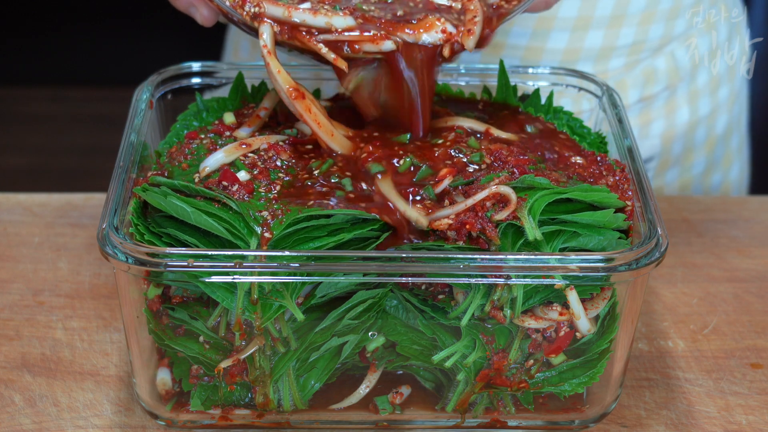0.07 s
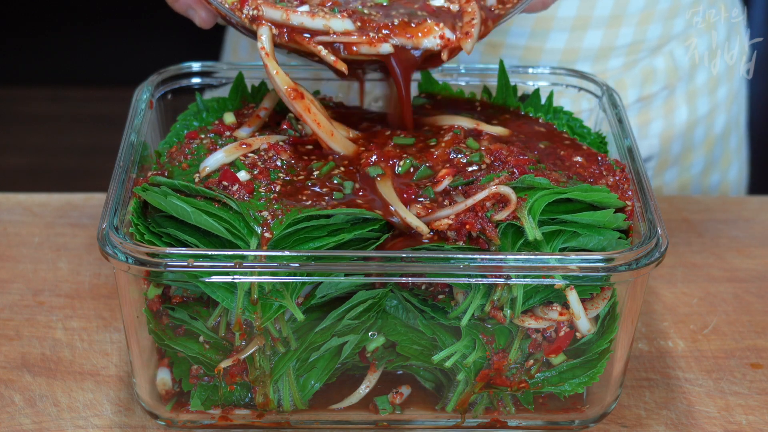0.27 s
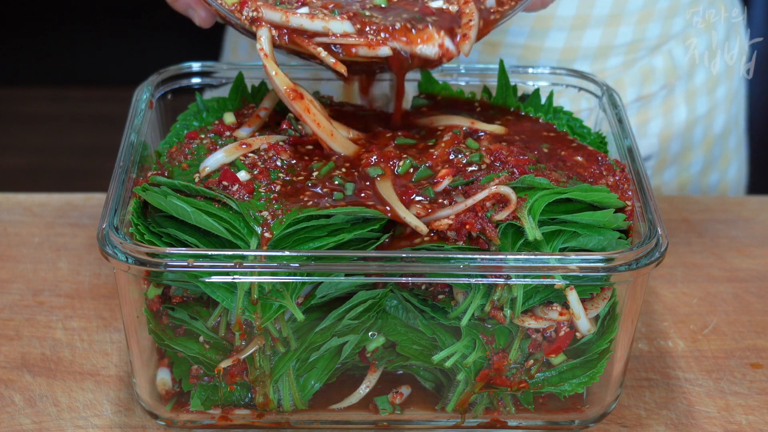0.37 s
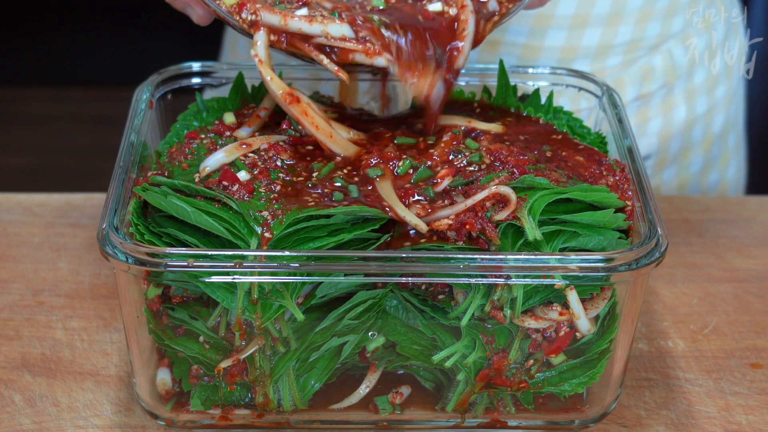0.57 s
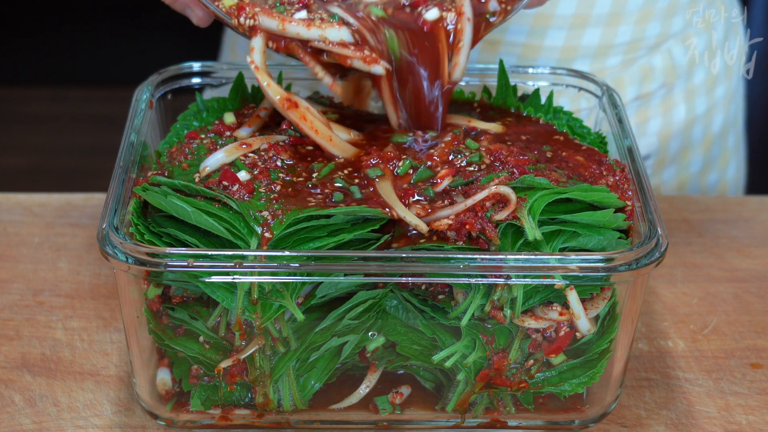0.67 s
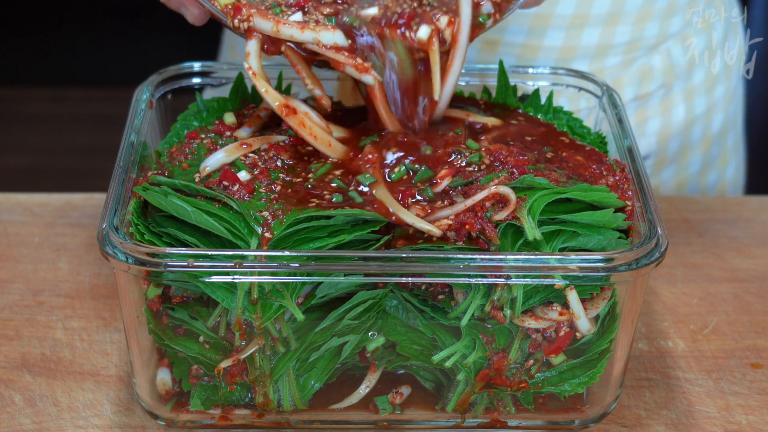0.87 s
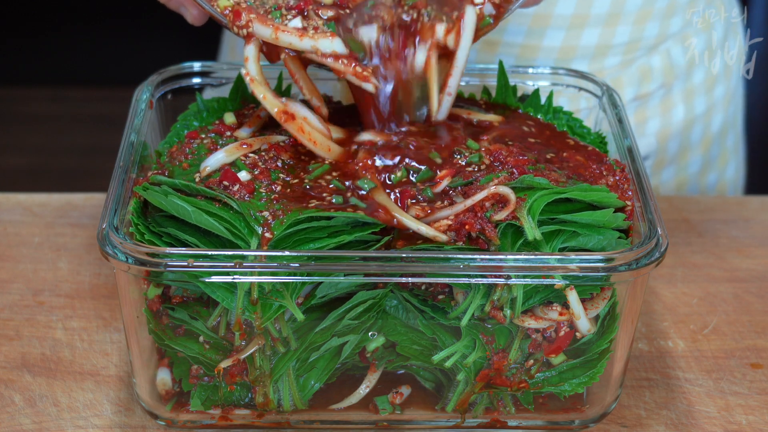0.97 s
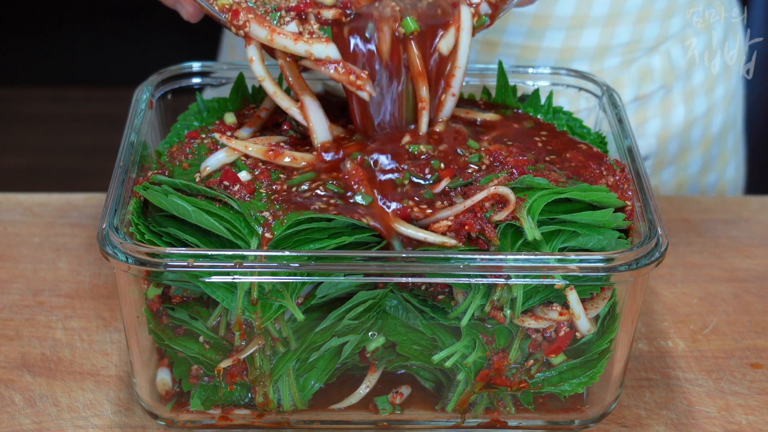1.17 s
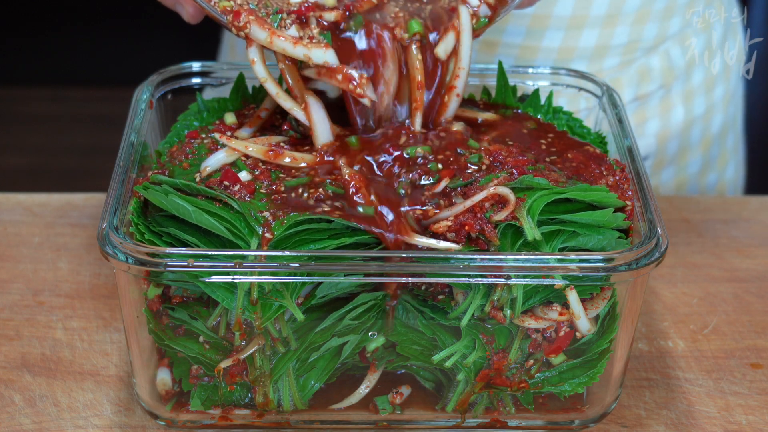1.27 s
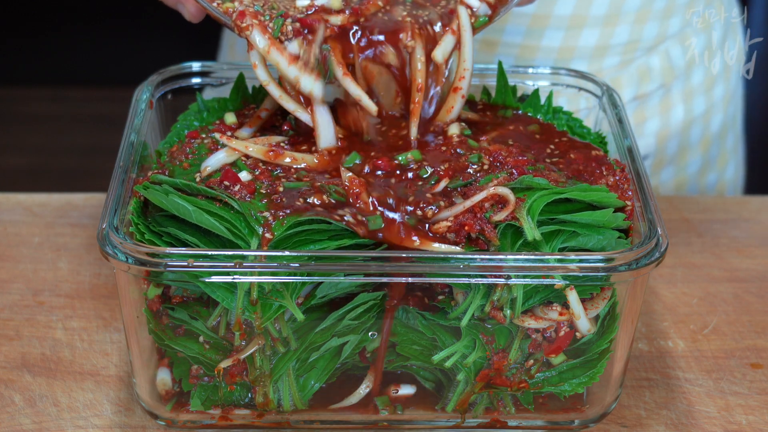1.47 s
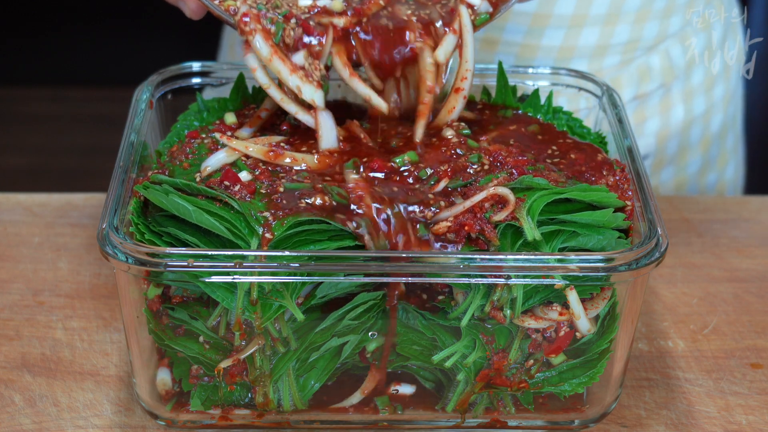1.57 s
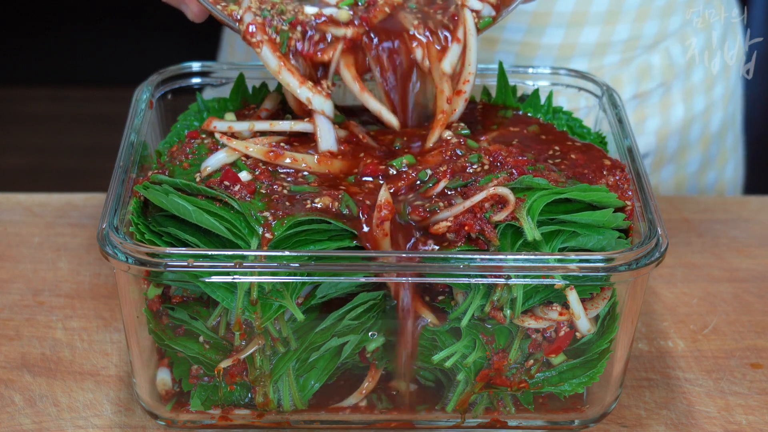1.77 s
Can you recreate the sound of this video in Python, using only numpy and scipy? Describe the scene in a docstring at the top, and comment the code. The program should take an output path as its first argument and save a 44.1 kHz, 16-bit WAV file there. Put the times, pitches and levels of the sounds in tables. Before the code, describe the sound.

Thick sauce pours softly onto leaves with small wet splats and one dull knock.

```python
"""Thick sauce slides from a bowl onto leaves packed in a glass container on a wooden board.
The pour is nearly silent: a soft slither of tiny splats, with clumps squelching, air pockets
ringing as small bubbles and a few wet snaps. The glass ticks faintly, and early on the
vessels knock once, dully. Under it all sits the low hum of a slightly live kitchen."""
import sys
import numpy as np
from scipy import signal
from scipy.fft import rfft, irfft
from scipy.io import wavfile

SR = 44100
rng = np.random.default_rng(int(sys.argv[2]) if len(sys.argv) > 2 else 0)


def log_audio(samples):
    """Write samples as a 16-bit WAV file to the path given in sys.argv[1]."""
    # one column per channel
    frames = np.atleast_2d(samples).T
    # limit to full scale, then quantise
    limited = np.clip(frames, -1, 1)
    pcm = np.round(limited * 32767).astype(np.int16)
    wavfile.write(sys.argv[1], SR, pcm)


N = 79380


def amp(db):
    """Decibels to gain."""
    return 10 ** (np.asarray(db) / 20)


def unit_rms(x):
    """Scales to rms 1."""
    return x / np.sqrt(np.mean(x ** 2) + 1e-20)


def curve_at(points, hz):
    """Reads a table on a log-frequency axis."""
    point_hz, value = np.transpose(points)
    return np.interp(np.log(hz + 1), np.log(point_hz + 1), value)


def add(mix, start_s, sound):
    """Mixes a sound in at a time."""
    part = mix[round(start_s * SR):][:len(sound)]
    part += sound[:len(part)]


def colour(x, eq):
    """Shapes a signal with an EQ curve, at rms 1."""
    gain = amp(curve_at(eq, np.fft.rfftfreq(len(x), 1 / SR)))
    return unit_rms(irfft(rfft(x) * gain, len(x)))


def ring(hz, t60, rise_s, glide_per_s=0):
    """A dying sine with a soft attack, whose pitch may glide upward."""
    t = np.arange(SR) / SR
    envelope = (1 - np.exp(-t / rise_s)) * amp(-60 * t / t60)
    return envelope * np.sin(2 * np.pi * hz * t * (1 + glide_per_s * t / 2))


def grains(eq, per_s, spread_db):
    """Random tiny pops of uneven size, with one colour."""
    sizes = amp(spread_db * np.minimum(rng.exponential(1, N), 4)) * rng.choice([-1, 1], N)
    return colour(sizes * (rng.random(N) < per_s / SR), eq)


def impulse(eq):
    """A minimum-phase click with a given colour, at peak 1."""
    log_gain = np.log(amp(curve_at(eq, abs(np.fft.fftfreq(SR, 1 / SR)))))
    click = np.fft.ifft(np.exp(np.conj(signal.hilbert(log_gain)))).real
    return click / abs(click).max()


def burst(eq, db, t60):
    """A dying burst of coloured noise; db is its starting rms."""
    t, shape = np.arange(SR) / SR, impulse(eq)
    noise = amp(db - 60 * t / t60) * rng.standard_normal(SR)
    return signal.fftconvolve(noise, shape / np.linalg.norm(shape))[:SR]


# The kitchen's reverb tail. Each row: frequency in Hz, t60 in seconds.
ROOM_DECAY = [(100, 0.44), (600, 0.69), (2500, 0.61), (9000, 0.45), (13500, 0.68), (16000, 0.25)]
# Early reflections. Each row: delay in seconds, level in dB.
REFLECTIONS = [(.0058, -11.5), (.009, -21.5), (0.0162, -23.5)]

def room(x, wet_db):
    """Adds a few near reflections and a short diffuse tail to the dry sound."""
    hz, t, spectrum = signal.stft(rng.standard_normal(SR), SR, nperseg=256)
    decay = amp(-60 * t / curve_at(ROOM_DECAY, hz)[:, None])
    tail = signal.istft(spectrum * decay, SR, nperseg=256)[1]
    tail *= 1 - np.exp(-np.arange(len(tail)) / SR / 0.004)  # builds over 4 ms
    tail /= np.linalg.norm(tail)
    for delay, db in REFLECTIONS:
        add(tail, delay, amp([db]))
    return x + amp(wet_db) * signal.fftconvolve(x, tail)[:N]


# Room tone, heavy in the lows. Each row: frequency in Hz, relative level in dB.
AIR_EQ = [(20, -20), (45, -14), (70, -2.5), (105, 1), (140, -3), (200, -4.5), (330, -5), (560, -21.5),
          (720, -10), (900, -20), (1150, -19.5), (1500, -31.5), (1850, -27.5), (2100, -24), (2450, -28.5),
          (3600, -34), (4200, -29.5), (4700, -31.5), (7500, -34.5), (16000, -29.5)]
# Appliance hum. Each row: pitch in Hz, level in dB.
HUM_TONES = [(210, -62.5), (268, -64.5), (317, -61.5), (678, -64), (754, -66.5), (2078, -77), (4160, -84.5),
             (5850, -85.5)]

def kitchen():
    """A bed of steady air noise and the wavering tones of an appliance."""
    t, freqs = np.arange(N) / SR, np.fft.rfftfreq(N, 1 / SR)
    waver_depth, waver_hz = 0.73, 3.7
    smoothing = np.exp(-(freqs / waver_hz) ** 2)
    out = amp(-53) * colour(rng.standard_normal(N), AIR_EQ)
    for hz, db in HUM_TONES:
        drift = [unit_rms(irfft(rfft(noise) * smoothing, N)) for noise in rng.standard_normal((2, N))]
        waver = 1 + waver_depth * (drift[0] + 1j * drift[1])  # in level and phase
        tone = np.exp(2j * np.pi * (hz * t + rng.random()))
        out += amp(db) * unit_rms((tone * waver).real)
    return out


# The swell and ebb of the pour. Each row: time in seconds, level in dB.
FLOW_LEVEL = [(0, -59.5), (.65, -64.5), (.8, -54), (.98, -64), (1.18, -55.5), (1.4, -59.5), (1.6, -57.5),
              (1.8, -58.5)]
# Its muffled tone. Each row: frequency in Hz, relative level in dB.
SLITHER_EQ = [(80, -74), (200, 2.5), (380, 11.5), (800, -2), (1300, -13.5), (2500, -33), (6000, -30),
              (16000, -43)]

def slither():
    """Many tiny dull splats as the stream folds onto the leaves."""
    flow = amp(np.interp(np.arange(N) / SR, *np.transpose(FLOW_LEVEL)))
    return room(flow * grains(SLITHER_EQ, per_s=1100, spread_db=4.5), wet_db=-6.5)


# The glass's bright modes. Each row: pitch in Hz, relative level in dB, t60 in seconds.
GLASS_MODES = [(2690, -8, 0.015), (3990, -11.5, 0.05), (7240, -12, 0.022), (7800, -11, .025),
               (11300, 1, .016), (14100, -3, .012)]
# The cue for the tick. Each row: start in seconds, level in dB.
GLASS_TOUCHES = [(0.1077, -46)]

def glass_tick():
    """A light touch rings the glass, damped by its contents."""
    out = np.zeros(N)
    tick = sum(amp(db) * ring(hz, t60, rise_s=0.0001) for hz, db, t60 in GLASS_MODES)
    for start, db in GLASS_TOUCHES:
        add(out, start, amp(db) * tick)
    return room(out, wet_db=-16)


# Squelch cues. Each row: start in seconds, level in dB, t60 in seconds.
SQUELCH_CUES = [(0.108, -61, 0.93), (1.155, -57.5, 0.75), (1.383, -56, 0.15)]
# Their wet midrange. Each row: frequency in Hz, relative level in dB.
SQUELCH_EQ = [(400, -5), (900, 13.5), (1800, 2), (3400, -2), (5000, -7.5), (8000, -9.5), (16000, -22)]

def squelches():
    """Short flurries of fine wet crackle as clumps shift."""
    envelope, t = np.zeros(N), np.arange(SR) / SR
    rise_s = 0.0054
    for start, db, t60 in SQUELCH_CUES:
        add(envelope, start, (1 - np.exp(-t / rise_s)) * amp(db - 60 * t / t60))
    return room(envelope * grains(SQUELCH_EQ, per_s=1600, spread_db=4.5), wet_db=1)


# Small blips. Each row: start in seconds, level in dB, starting pitch in Hz, t60 in seconds.
BUBBLE_CUES = [(0.1142, -40.5, 2100, 0.022), (1.066, -41.5, 1480, 0.031), (1.162, -40, 1200, 0.026),
               (1.1950, -51, 844, 0.12), (1.21, -48.5, 1186, 0.12), (1.4040, -39, 446, 0.24),
               (1.6040, -38.5, 1570, 0.026), (1.654, -53.5, 1630, .035)]

def bubbles():
    """Air pockets close in the sauce and ring softly, rising a little in pitch."""
    out = np.zeros(N)
    for start, db, hz, t60 in BUBBLE_CUES:
        add(out, start, amp(db) * ring(hz, t60, rise_s=0.0019, glide_per_s=0.47))
    return room(out, wet_db=-10)


# Sauce snaps and, at 3990 Hz, one glass tick. Each row: start in seconds, level in dB, pitch in Hz,
# t60 in seconds, click level in dB relative to the ring, the ring's reverb send in dB.
CLICK_CUES = [(0.1507, -23.5, 9560, 0.0052, -30, -1.5), (0.5855, -50.5, 3000, 0.0069, -3, -13),
              (1.0556, -45.5, 5220, 0.0057, -13, -3.5), (1.1086, -51, 8500, 0.02, -25, -2),
              (1.1182, -25.5, 2666, 0.012, 6, -8), (1.1235, -46, 10100, 0.004, 9, -9),
              (1.159, -34.5, 2900, 0.0043, 2, -14), (1.3474, -46, 3990, .012, 3, -6),
              (1.3849, -33.5, 3180, 0.0039, -11, -5), (1.4057, -41, 6500, 0.0026, 0, -6),
              (1.6310, -43.5, 7800, 0.0022, 1, 1)]
# The crisp edge of a click. Each row: frequency in Hz, relative level in dB.
CLICK_EQ = [(300, -8), (1500, 1), (4000, 6.5), (8000, 2), (9800, 2), (11300, -9.5), (13500, 8), (16000, -3)]

def ringing_clicks():
    """Short clicks with a brief ring: films of sauce snapping and a light tick of the glass."""
    out = np.zeros(N)
    for start, db, hz, t60, click_db, wet_db in CLICK_CUES:
        tone, click = np.zeros((2, N))
        add(tone, start, amp(db) * ring(hz, t60, rise_s=0.00015))
        add(click, start, amp(db + click_db) * impulse(CLICK_EQ))
        out += room(tone, wet_db) + room(click, wet_db + 4.5)
    return out


# The cue for the knock: start in seconds, level of its ring in dB.
KNOCK_CUE = (0.2268, -11.5)
# Vessels and board. Each row: pitch in Hz, relative level in dB, t60 in seconds, attack in seconds.
BODY_MODES = [(132.4, -5, .36, 0.013), (211, -21, 0.31, .002), (384.5, -3.5, 0.055, 0.0027),
              (438, -13.5, 0.13, 0.0069), (547, -16, 0.096, 0.0031), (637.2, 5.5, 0.079, 0.0079),
              (778, -2.5, 0.036, 0.0013), (893, -2.5, 0.023, 0.0011), (990, -17, 0.017, 0.0009),
              (1119, -6, 0.063, 0.0048), (1303, -21.5, .06, 0.00038), (1450, -27, 0.045, 0.00044),
              (1796, -19, 0.048, 0.0012), (1830, -29, 0.014, 0.0012), (2890, -31, 0.024, 0.00036),
              (3990, -43, 0.077, .0004)]
# The worktop's low shudder. Each row: frequency in Hz, relative level in dB.
SHUDDER_EQ = [(20, -15), (40, -14), (62, -5), (85, -9), (120, -21), (400, -60), (2000, -88)]
# The dull contact itself. Each row: frequency in Hz, relative level in dB.
THUD_EQ = [(35, -15), (70, -15), (130, 7), (250, -2.5), (450, 7), (800, 3), (1150, -9.5), (1500, -12.5),
           (2500, -27), (4500, -35), (7000, -41), (12000, -58)]

def knock():
    """A cushioned blow rings the filled vessels and the board; its thud spreads through the room."""
    body, thud = np.zeros((2, N))
    start, level_db = KNOCK_CUE
    for hz, db, t60, rise_s in BODY_MODES:
        add(body, start, amp(level_db + db) * ring(hz, t60, rise_s))
    add(body, start, burst(SHUDDER_EQ, db=-47, t60=0.91))
    add(thud, start, amp(-21) * impulse(THUD_EQ))
    return room(body, wet_db=-12) + room(thud, wet_db=6.5)


def scene():
    """The pour and the kitchen, close up and in mono."""
    mix = kitchen() + slither() + glass_tick() + squelches() + bubbles() + ringing_clicks() + knock()
    return mix[None]


def record(dry):
    """A steep low-pass trims the top above 16 kHz."""
    lowpass = signal.firwin(511, 16000, window=("kaiser", 9), fs=SR)
    return signal.oaconvolve(dry, lowpass[None], "same")


dry = scene()
out = record(dry)
log_audio(out)
```